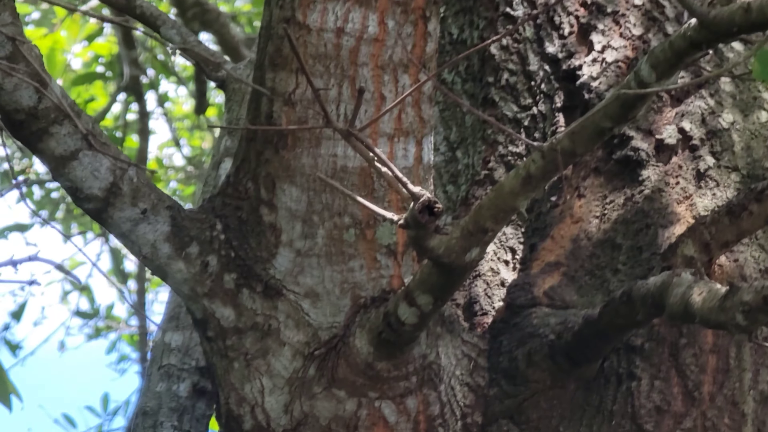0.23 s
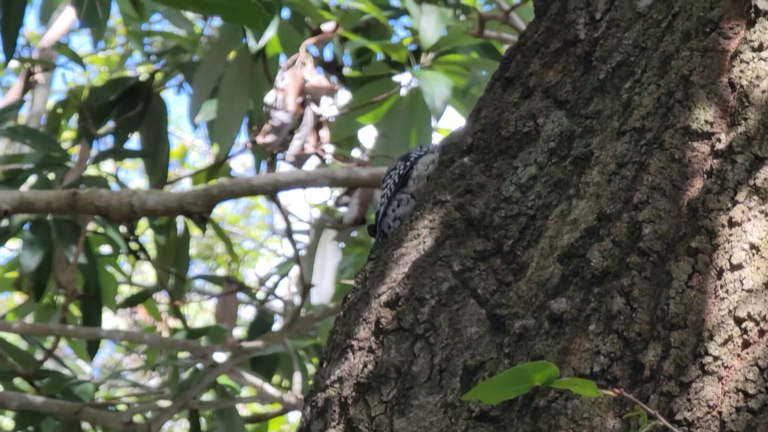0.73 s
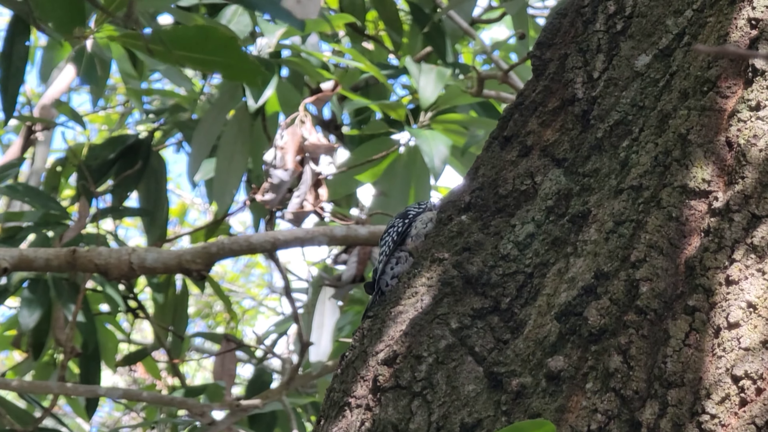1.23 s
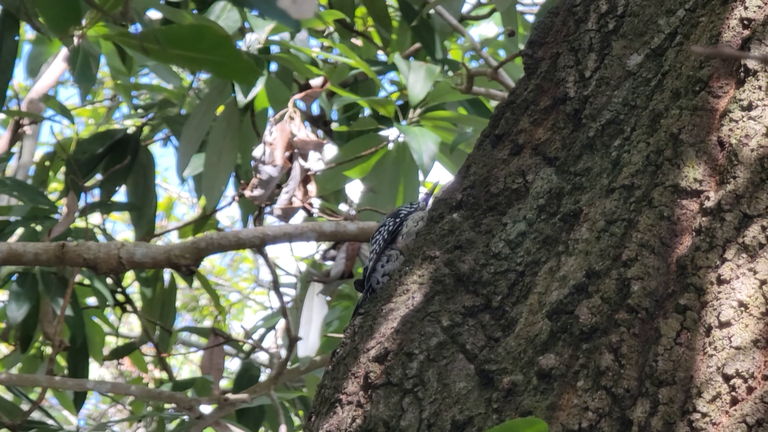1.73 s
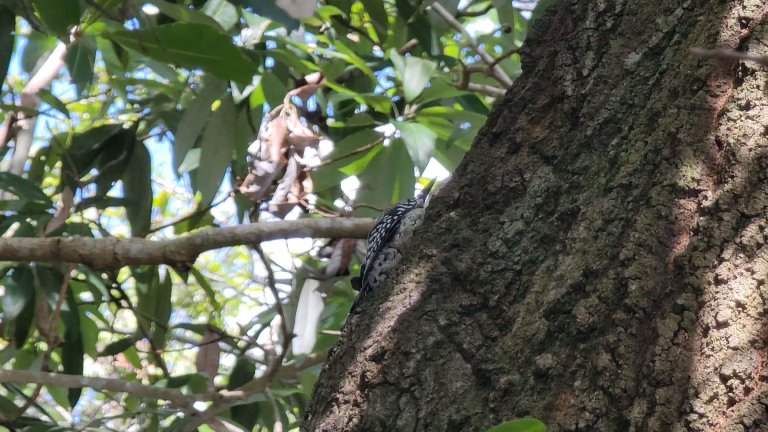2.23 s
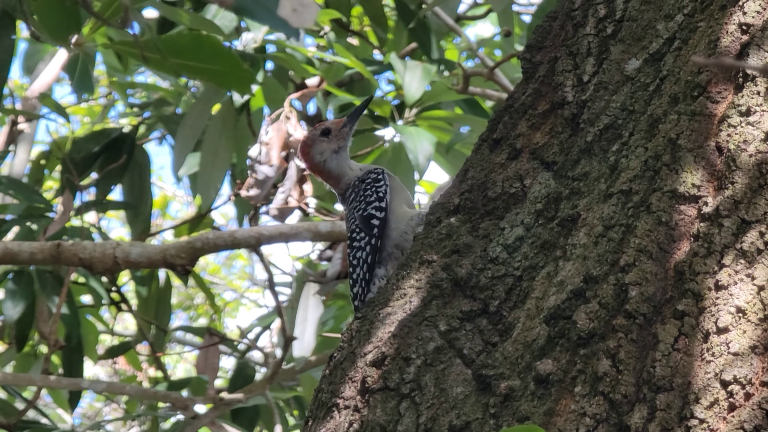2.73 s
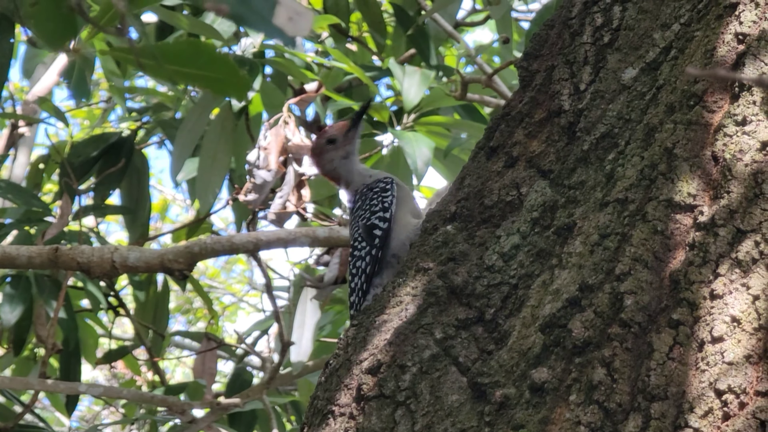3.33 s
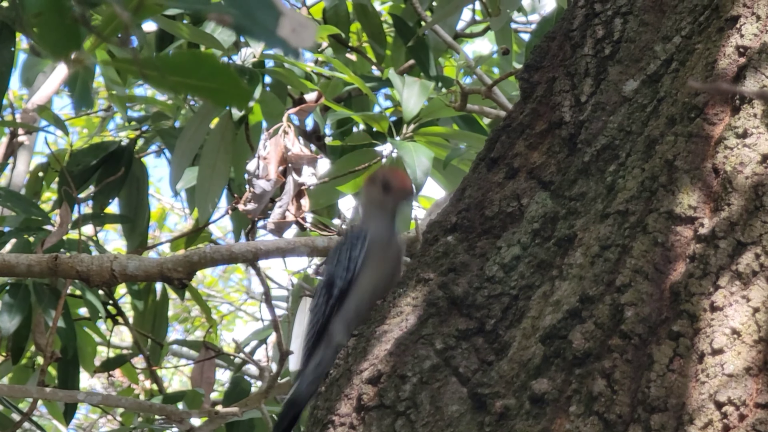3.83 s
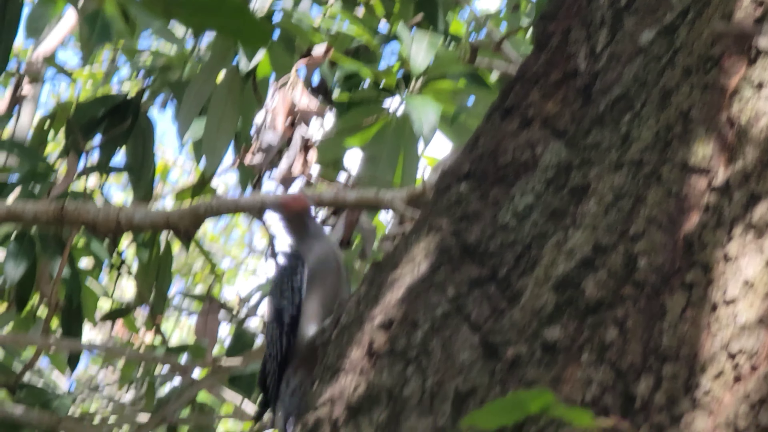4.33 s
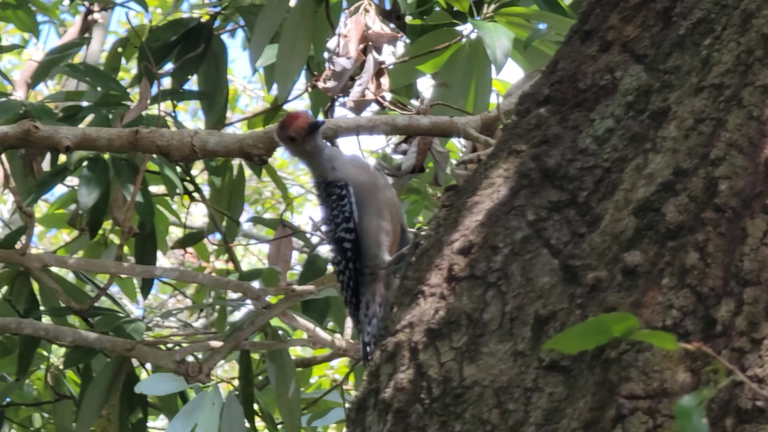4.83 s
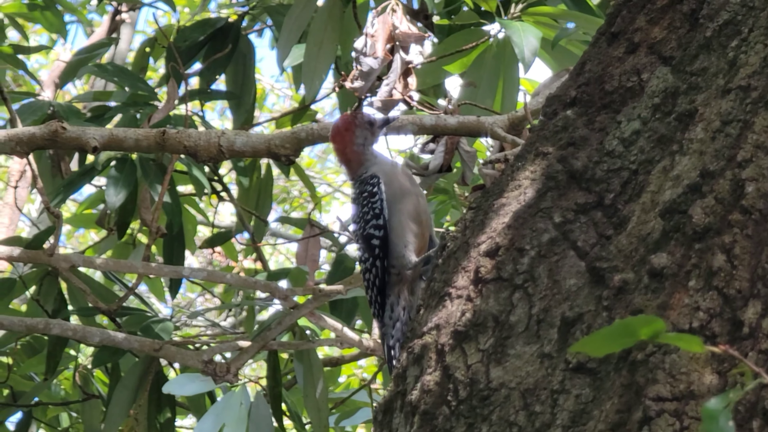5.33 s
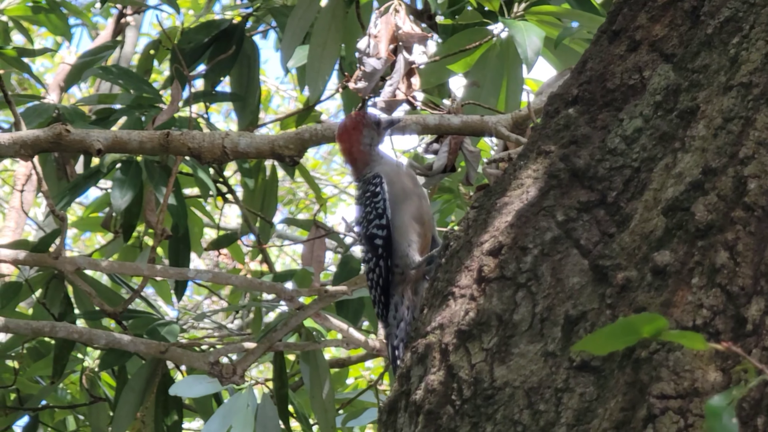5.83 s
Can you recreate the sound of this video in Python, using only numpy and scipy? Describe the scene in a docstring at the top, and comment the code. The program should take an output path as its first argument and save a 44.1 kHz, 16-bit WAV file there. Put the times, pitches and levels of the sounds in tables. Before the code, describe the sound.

Far engines boom and roads wash softly beneath a faint, airy rustle of leaves that grows a little louder. After two barely audible bird hoots, a nearby woodpecker calls five times at steady intervals: short, piercing, nearly whistled notes that arch and drop into a frayed, quiet ending. Branches scatter each call into a short diffuse echo. The bird sits a few metres off to the right of a small stereo microphone in a grove.

```python
"""Throughout, far traffic rumbles low, as booming bands of noise under a broad wash, and leaves hiss thinly,
as shaped noise of uneven level, somewhat louder later. Early on, two faint hoots of far birds sound as
wavering sines. Then a woodpecker a few metres away, at first half hidden behind a trunk, gives five short
calls that arch and fall: a harmonic stack, nearly pure on its second harmonic until it frays into a weak,
rough ending. Limbs and foliage scatter the calls into echoes, made by convolution with decaying noise."""
import sys
import numpy as np
from scipy import signal
from scipy.fft import rfft, irfft, next_fast_len
from scipy.io import wavfile

SR = 44100
rng = np.random.default_rng(int(sys.argv[2]) if len(sys.argv) > 2 else 0)


def to_wav(sig):
    """Store sig (one row per channel, or 1-D mono) as 16-bit WAV at the path in sys.argv[1].

    Samples outside -1..1 are clipped; the rate is SR.
    """
    pcm = np.clip(np.atleast_2d(sig), -1, 1) * 32767
    pcm = np.round(pcm).astype(np.int16)
    wavfile.write(sys.argv[1], SR, pcm.T)  # frames by channels


N = 268304

T = np.arange(N) / SR  # seconds
FREQ = np.maximum(np.arange(N // 2 + 1) * SR / N, 1)  # Hz, kept off zero for the log axis


def undb(db):
    """Decibels to gain."""
    return 10 ** (np.asarray(db) / 20)


def level(x, db):
    """Set the rms level."""
    return x * undb(db) / np.sqrt(np.mean(x ** 2))


def at_hz(table, hz):
    """Every column of a table after the first, read on a log-frequency axis."""
    points, *columns = np.transpose(table)
    return [np.interp(np.log(hz), np.log(points), column) for column in columns]


def pan(db):
    """Left and right gains for a left-minus-right level difference."""
    return undb(np.array([[1], [-1]]) * db / 2)


def noise(channels=2):
    """Spectra of unrelated white noises."""
    return rfft(rng.standard_normal((channels, N)))


def walk(rate):
    """Smooth random wander with a spread of 1, its spectrum falling away above the rate [Hz]."""
    size = next_fast_len(N)
    hz = np.arange(size // 2 + 1) * SR / size
    spectrum = rfft(rng.standard_normal(size)) / (1 + (hz / rate) ** 4)
    return level(irfft(spectrum, size)[:N], 0)


def at_ports(gain):
    """Noise of a given colour as two microphone ports hear it: alike in the bass, opposed in the middle."""
    # how the ports hear far sound:
    # (frequency [Hz], likeness [0-1], left lead [radians], left minus right [dB])
    port_pair = [(34.5, 1, 0.25, -4), (85, 0.96, 0.13, -1), (220, 0.81, 0.11, -3.5), (286, 0.6, 0.74, -1.5),
                 (440, 0.52, 2.1, -0.5), (576, 0.66, 2.23, 0), (1455, 0.7, 3.37, -2),
                 (1820, 0.11, 3.66, -1.5), (4500, 0.18, 3.5, 1)]
    likeness, lead, balance_db = at_hz(port_pair, FREQ)
    likeness = np.clip(likeness, 0, 1)
    shared = noise(channels=1) * np.exp(.5j * lead * np.array([[1], [-1]]))
    mixed = np.sqrt(likeness) * shared + np.sqrt(1 - likeness) * noise()
    return irfft(mixed * gain * pan(balance_db), N)


def traffic(boom_db=0.15, roads_db=-52.0, waver_db=0.72, split_hz=66):
    """Narrow booming resonances of engines, deep and upper bands wavering separately, under a wash of tyres."""
    # boom and drone of far engines:
    # (centre [Hz], distance from centre where it is 12 dB down [Hz], relative level [dB])
    resonances = [(39.2, 20, -11), (54.95, 9.5, 4.5), (75, 20, 1.5), (92, 7.1, 2.5), (106.2, 23.6, -4),
                  (114.8, 10.2, -4.5), (184, 20, -21.5), (365, 13, -16)]
    # uneven level of the low rumble:
    # (time [s], relative level of the deep band [dB], relative level of the upper band [dB])
    rumble_levels = [(0.0, -48, -49.5), (0.36, -52, -51), (1.32, -49, -47.5), (1.74, -56.5, -48.5),
                     (1.92, -54, -49.5), (2.28, -48, -47), (2.7, -63, -47), (3.0, -49, -47),
                     (3.42, -56, -49), (3.96, -51, -45), (4.26, -53, -49.0), (4.5, -52.5, -52.5),
                     (4.74, -50, -46.5), (5.1, -52, -49.5), (5.28, -52, -51), (5.46, -50.5, -47.5),
                     (6.06, -50.0, -48)]
    # colour of the wash of far roads: (frequency [Hz], relative density [dB per Hz])
    road_colour = [(20, -36), (60, 9), (150, 0.5), (230, 0), (350, 0.5), (550, -1), (760, 1.5), (1250, -5),
                   (1700, -12), (2500, -16.5), (4000, -23), (9000, -38)]

    power = sum(undb(db) ** 2 / (1 + ((FREQ - hz) / width) ** 2) ** 4 for hz, width, db in resonances)
    times, deep_db, upper_db = np.transpose(rumble_levels)
    boom = 0
    for band, levels_db in [(FREQ < split_hz, deep_db), (FREQ >= split_hz, upper_db)]:
        drone = level(at_ports(np.sqrt(power) * band), boom_db)
        boom = boom + drone * undb(np.interp(T, times, levels_db))
    wash = at_ports(undb(at_hz(road_colour, FREQ)[0])) * undb(waver_db * walk(22))
    return boom + level(wash, roads_db)


def leaves(hiss_db=7.0, flicker_db=0.54):
    """Countless far leaves merge into a smooth hiss of uneven level, somewhat louder later."""
    # colour of the leaves: (frequency [Hz], relative density [dB per Hz], left minus right [dB])
    leaf_colour = [(1400, 4.5, -5), (3100, -4.5, -12), (4130, 0.5, -6.5), (6150, 0, -2.5),
                   (8860, 0.5, -0.5), (10170, -5, -1), (11200, -8, 2.5), (13000, -4.5, -3),
                   (15800, -10.5, 4)]
    # level of the hiss, uneven and somewhat louder later: (time [s], relative level [dB])
    hiss_levels = [(0.1, -74), (0.82, -73.5), (1.71, -69), (2.91, -72), (3.19, -69), (4.19, -69.5),
                   (4.34, -72), (6.0, -68)]
    colour_db, balance_db = at_hz(leaf_colour, FREQ)
    hiss = irfft(noise() * undb(colour_db) * pan(balance_db), N)
    uneven_db = np.interp(T, *np.transpose(hiss_levels))
    return level(hiss, hiss_db) * undb(uneven_db + flicker_db * walk(20))


def far_birds():
    """Soft, nearly pure tones from far off, each swelling and fading as half a sine."""
    # two hoots: (time [s], length [s], pitch [Hz], rise [octaves], peak level before echoes [dB],
    #             waver [share of the pitch])
    hoots = [(0.54, 0.2, 474, 0.01, -69.5, 0.02), (0.68, 0.15, 316, -0.016, -70, 0.013)]
    out, wander = np.zeros(N), walk(40)
    for start, length, hz, rise, db, waver in hoots:
        on = (T > start) & (T < start + length)
        part = (T[on] - start) / length
        pitch = hz * 2 ** (rise * (part - .5)) * (1 + waver * wander[on])
        tone = np.sin(2 * np.pi * np.cumsum(pitch) / SR)
        out[on] += undb(db) * np.sin(np.pi * part) * tone
    return out


def grove(x, near_t60=0.28, near_db=-12, far_t60=0.91, far_db=-16, build_s=0.0048, return_s=0.16, return_db=-31):
    """Nearby limbs return separate echoes, the canopy a diffuse tail, and far trees one blurred late echo."""
    t = T[:SR]
    # the fifth power leaves sparse spikes, which stand apart as echoes
    limbs = rng.standard_normal((2, SR)) ** 5 * undb(-60 * t / near_t60) * (t > .012)
    canopy = rng.standard_normal((2, SR)) * undb(-60 * t / far_t60) * (1 - np.exp(-t / build_s))
    far_trees = rng.standard_normal((2, SR)) * np.exp(-((t - return_s) / 0.042) ** 2)
    response = level(limbs, near_db) + level(canopy, far_db) + level(far_trees, return_db)
    return signal.fftconvolve(x[None], response / np.sqrt(SR), axes=1)[:, :N]


def woodpecker(ending_echo_db=-2):
    """The calls as sent into the grove, and as they arrive along the straight path past the trunk."""
    # calls, with pitches of the fundamental:
    # (time [s], scoop [Hz], scoop [s], pitch held [s], loud part [s], whole length [s],
    #  top pitch [Hz], initial fall [Hz per s], deepest fall [Hz], relative level [dB],
    #  weak ending [dB], its fade [dB per s], other harmonics [dB],
    #  straight path over echoes, relative [dB]: low while the trunk hides the bird)
    calls = [(1.528, 279, 0.022, 0.073, 0.069, 0.24, 1394, 5240, 304, -48, -13.5, 50, 1, -5.5),
             (2.308, 149, 0.016, 0.059, 0.055, 0.26, 1378, 3020, 700, -49, -11, 80, 3, 0),
             (3.084, 90, 0.01, 0.062, 0.067, 0.15, 1333, 3000, 400, -49.5, -16, 130, 0, 3),
             (4.057, 148, 0.0127, 0.035, 0.056, 0.15, 1361, 2650, 520, -48, -15, 120, -5, 2),
             (4.916, 163, 0.011, 0.055, 0.059, 0.25, 1307, 2486, 904, -49.5, -7, 86, -13, -1.5)]
    sent, straight = np.zeros(N), np.zeros(N)
    for (start, scoop_hz, scoop_s, held_s, loud_s, length_s, top_hz, fall, depth_hz, db,
         ending_db, fade, overtone_db, shade_db) in calls:
        on = (T > start) & (T < start + length_s)
        t = T[on] - start
        pitch = arch(t, scoop_hz, scoop_s, held_s, top_hz, fall, depth_hz)
        tone = syrinx(pitch, overtone_db)
        call = tone * effort(t, scoop_s, loud_s, ending_db, fade) * undb(db)
        # the weak ending carries less far into the grove
        ending = np.clip(t / loud_s - 1, 0, 1)
        sent[on] += call * undb(ending_echo_db * ending - shade_db)
        straight[on] += call
    return sent, straight


def arch(t, scoop_hz, scoop_s, held_s, top_hz, fall, depth_hz, knee_s=0.0064):
    """Pitch of a call: a quick scoop up, a hold, then a fall that slows as it nears its deepest."""
    since_hold = knee_s * np.logaddexp(0, (t - held_s) / knee_s)  # a rounded corner into the fall
    scoop = scoop_hz * np.exp(-(t / scoop_s) ** 2)
    return top_hz - scoop - depth_hz * np.tanh(fall * since_hold / depth_hz)


def syrinx(pitch, overtone_db, waver=0.0034, rasp=0.03, fray=0.0177, break_db=5.5, flicker_db=4,
           fray_sag=0.17, frayed_overtone_db=1.5):
    """A harmonic stack that frays, breaks up and changes its overtones as the pitch sags; the throat picks
    what lies near 2.7 kHz: the second harmonic at first, the third at the end of a deep fall."""
    # throat and beak pass one harmonic and hold back the rest: (frequency [Hz], gain [dB])
    throat = [(1000, -36), (1350, -27), (1800, -13), (2050, -12), (2300, -3.5), (2700, -1.5), (2900, -19),
              (3100, -24), (3300, -19), (3700, -22), (4100, -35), (5200, -37), (5550, -27), (7000, -49)]
    n = len(pitch)
    sag = 1 - pitch / np.maximum.accumulate(pitch)
    frayed = np.tanh(sag / fray_sag)  # nears 1 as the sag passes fray_sag, a share of the pitch
    pitch = pitch * (1 + (waver + fray * frayed) * walk(110)[:n])
    phase = 2 * np.pi * np.cumsum(pitch) / SR
    others_db = overtone_db * (1 - frayed) + frayed_overtone_db * frayed + flicker_db * walk(53)[:n]
    stack = np.zeros(n)
    for k in range(1, 6):
        harmonic_db = at_hz(throat, k * pitch)[0] + others_db * (k != 2)
        stack += undb(harmonic_db) * np.sin(k * phase)
    return stack * (1 + rasp * walk(200)[:n]) * undb(break_db * frayed * walk(96)[:n])


def effort(t, scoop_s, loud_s, ending_db, fade):
    """Gain of a call: it opens during the scoop, swells, and releases into a weak, fading ending."""
    attack_db, attack_scoops, swell_db_per_s = 18, 1.63, 101
    release_s, edge_s = 0.02, 0.0075
    before, after = np.maximum(loud_s - t, 0), np.maximum(t - loud_s, 0)
    rise_db = -attack_db * np.exp(-(t / (attack_scoops * scoop_s)) ** 2) - swell_db_per_s * before
    release_db = ending_db * (1 - np.exp(-(after / release_s) ** 2)) - fade * after
    edges = np.clip(np.minimum(t, t[-1] - t) / edge_s, 0, 1)
    return undb(rise_db + release_db) * edges


def flutter(x, tremble_s=.000042, rate=60):
    """Swaying leaves make the delay of the echoes tremble slightly."""
    return np.array([np.interp(T + tremble_s * walk(rate), T, side) for side in x])


def scene():
    """The bird sits to the right, so its call reaches the left port later and weaker."""
    far = far_birds()
    sent, straight = woodpecker()
    late_left = np.interp(T - .00008, T, straight)  # 0.08 ms later
    direct = np.array([late_left, straight]) * pan(-6.3) * undb(11.0)
    echoes = flutter(grove(sent)) * pan(-0.65) * undb(13.2)
    return traffic() + leaves() + far + grove(far, far_db=12.0) + direct + echoes


def record(dry):
    """The recorder cuts the top with a steep low-pass at 15.4 kHz."""
    return signal.sosfilt(signal.ellip(10, .2, 70, 15400, fs=SR, output="sos"), dry)


dry = scene()
out = record(dry)
to_wav(out)
```